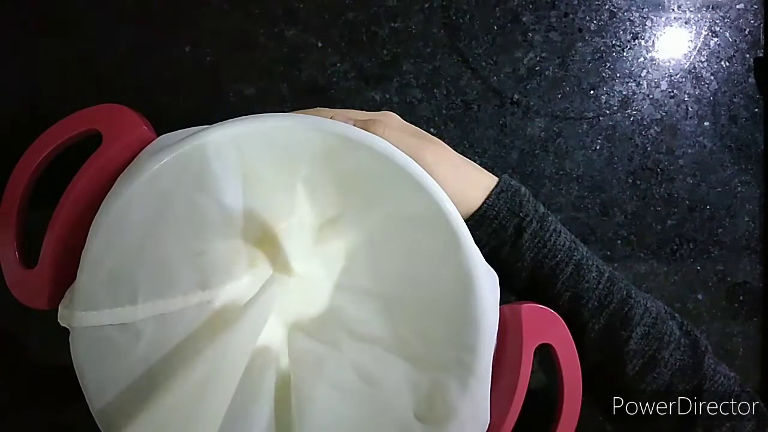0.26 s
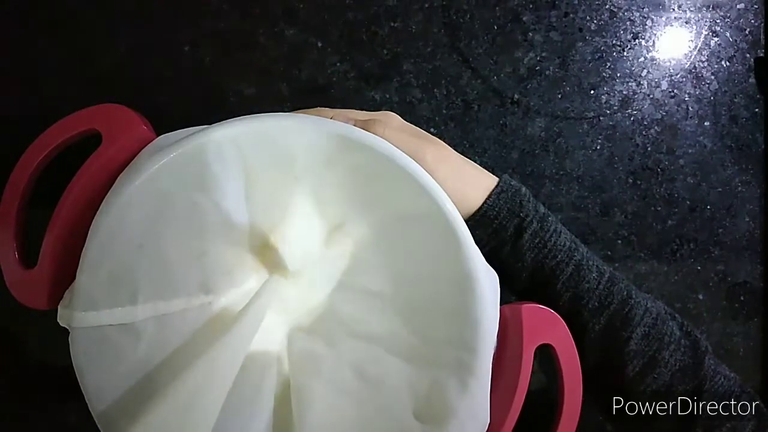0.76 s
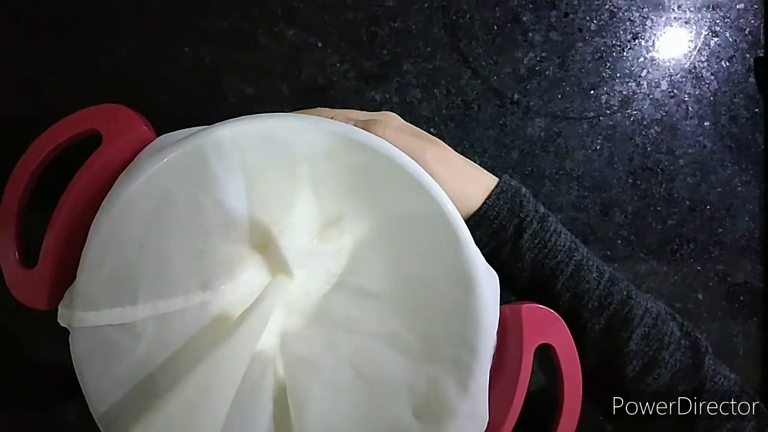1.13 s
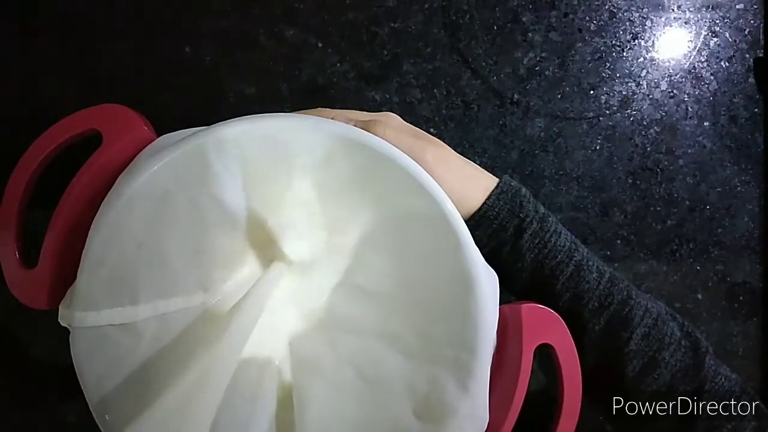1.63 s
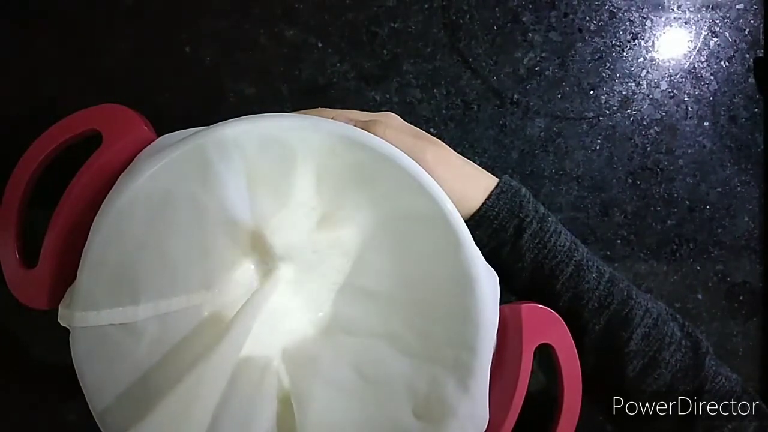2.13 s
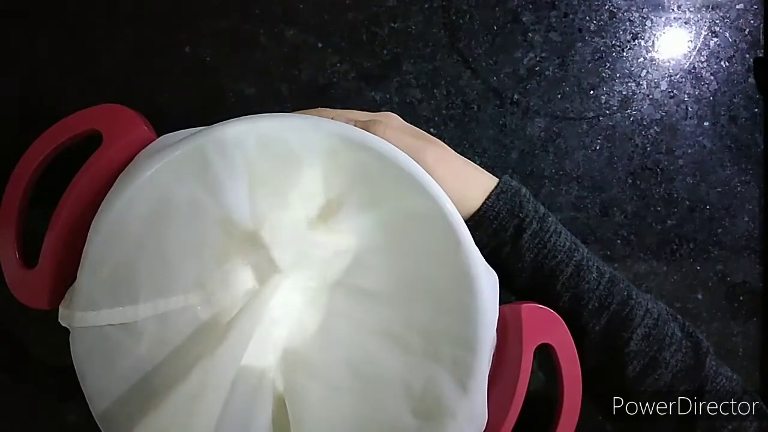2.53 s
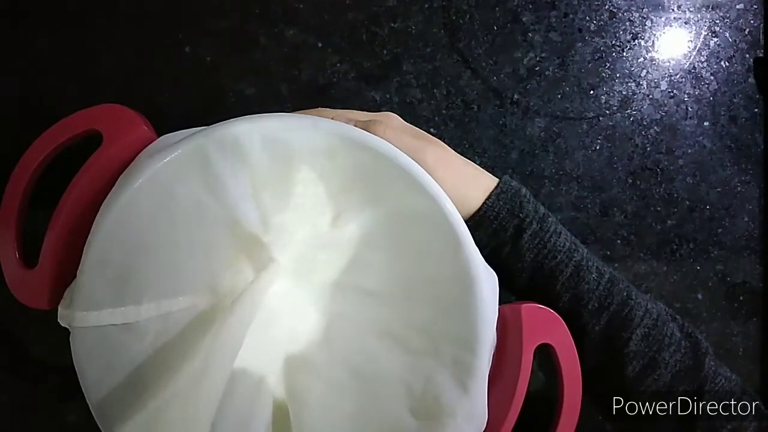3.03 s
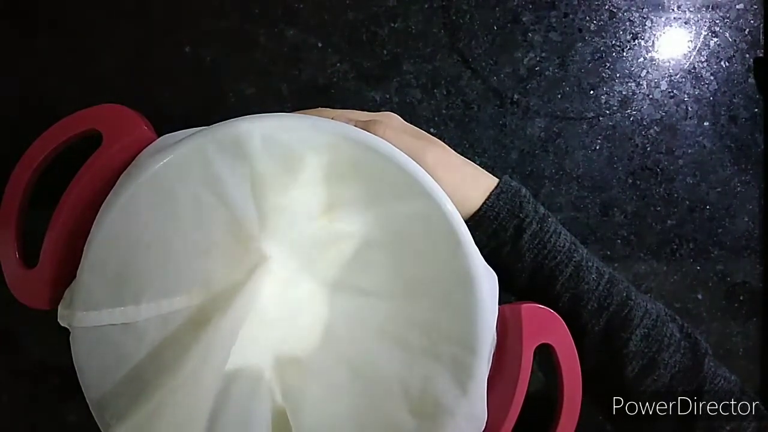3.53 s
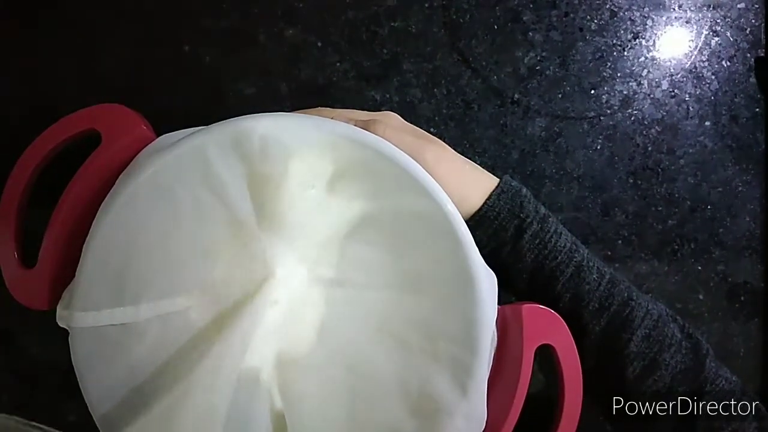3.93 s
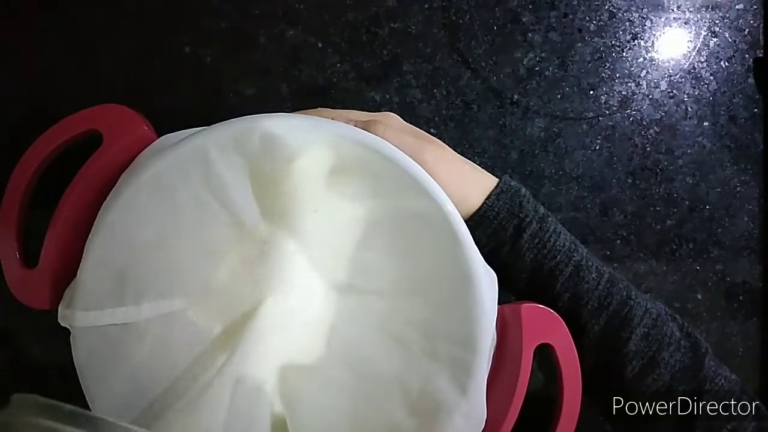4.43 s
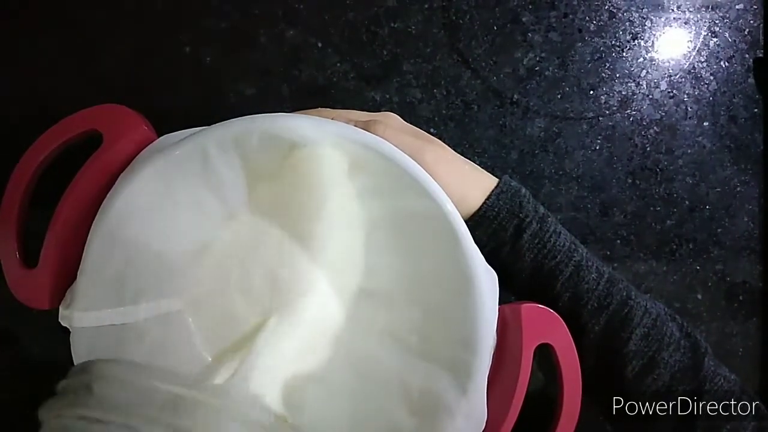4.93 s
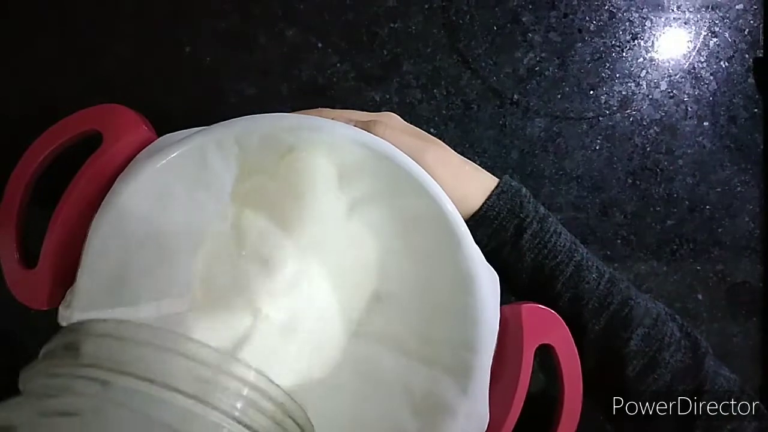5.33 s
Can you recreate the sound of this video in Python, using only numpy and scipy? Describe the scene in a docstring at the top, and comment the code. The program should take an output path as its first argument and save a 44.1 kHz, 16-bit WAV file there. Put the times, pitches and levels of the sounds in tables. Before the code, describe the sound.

Milk trickles through a cloth strainer into a metal pot, fizzing and plipping, thinning to sparse drips, then gulping in wet bursts over low rumble.

```python
"""Milk poured through a cloth strainer trickles into a steel pot with a fizz of tiny bubbles; a low rumble lies under it.
Jets and surges drive filtered random impacts and decaying bubble tones: a fizz, a fine mist and a coarse spatter.
The spatter excites the pot's resonances, and the enclosed air sounds with the jets.
Single drops tick, larger bubbles plip, and gulps flop into the cloth with a slap and the note of trapped air.
The rumble is filtered noise with a wavering spectrum, joined by a faint fuzzy tone; echoes spread the milk sounds."""
import sys
import numpy as np
from scipy import signal
from scipy.fft import rfft, irfft
from scipy.io import wavfile
from scipy.ndimage import uniform_filter1d, map_coordinates

SR = 44100
rng = np.random.default_rng(int(sys.argv[2]) if len(sys.argv) > 2 else 0)


def inscribe(sig):
    """Save sig as 16-bit PCM at rate SR to the path in sys.argv[1].

    A 1-D sig is mono; a 2-D sig holds one channel per row.
    Samples are clipped to [-1, 1] before scaling.
    """
    pcm = np.round(np.clip(np.atleast_2d(sig).T, -1, 1) * 32767)
    wavfile.write(sys.argv[1], SR, pcm.astype(np.int16))


N = 245195
TIME = np.arange(N) / SR  # [s]

# continuous seepage: (time [s], relative fizz level [dB], relative level of the deeper bubbles [dB])
SEEPAGE = [(0, -45, -7), (1.2, -43, 2), (1.45, -51, 3), (1.57, -48.5, 6), (1.8, -50.5, -0.5),
           (2.55, -51, 7), (2.77, -48.5, 1), (3.0, -51, 5), (3.3, -51.5, 3), (3.5, -52.5, 10.5),
           (3.7, -51, -16), (3.8, -55.5, -10), (3.95, -54, -12), (4.1, -50.5, 1.5), (4.65, -53.5, -11),
           (4.9, -60.5, -27), (5.1, -53.5, -5), (5.399, -53.5, -14)]
# low resonances of the pot: (frequency [Hz], bandwidth [Hz], gain [dB])
POT_MODES = [(920, 90, -9), (1123, 124, -11.5), (1450, 57, -7.5), (1800, 167, -3.5), (2024, 110, -7.5),
             (2197, 57, -1.5), (2730, 55, -1), (3090, 120, -8)]


def amp(db):
    """Logarithmic level: decibels become an amplitude ratio."""
    return 10 ** (np.asarray(db) / 20)


def evened(x):
    """Root-mean-square normalization: the mid signal of a stereo pair gets rms 1."""
    return x / np.sqrt(np.mean(x.mean(0) ** 2) + 1e-20)


def read(points, hz):
    """Spectral interpolation: a table is read on a log-frequency axis."""
    f, value = np.transpose(points)
    return np.interp(np.log(hz + 1), np.log(f + 1), value)


def level(curve):
    """Amplitude envelope: rows of (time [s], level [dB]) become a gain at every sample."""
    return amp(np.interp(TIME, *np.transpose(curve)))


def add(mix, s, sound):
    """Superposition: a sound is summed into the stereo mix from time s."""
    part = mix[:, max(round(s * SR), 0):][:, :sound.shape[-1]]
    part += sound[..., :part.shape[1]]


def panned(lean_db):
    """Interaural level difference: a left-right difference is split evenly into two gains."""
    return amp(np.array([[.5], [-.5]]) * lean_db)


def convolve(x, response):
    """Linear system: both channels pass through an impulse response and keep their length."""
    return signal.oaconvolve(x, np.atleast_2d(response), axes=1)[:, :x.shape[1]]


def coloured(x, points, size=4096):
    """Minimum-phase filtering: a causal response with the given spectrum keeps attacks sharp."""
    log_gain = np.log(amp(read(points, abs(np.fft.fftfreq(size, 1 / SR)))))
    # the Hilbert transform of the log gain yields the minimum phase
    spectrum = np.exp(np.conj(signal.hilbert(log_gain)))
    return convolve(x, np.fft.ifft(spectrum).real[:size // 2])


def ringing(modes):
    """Modal superposition: damped cosines, whose bandwidth sets their decay, form an impulse response."""
    t = np.arange(SR // 8) / SR
    response = np.zeros(len(t))
    for hz, width, db in modes:
        decay = np.exp(-np.pi * width * t)
        response += amp(db) * 2 * np.pi * width / SR * decay * np.cos(2 * np.pi * hz * t)
    return response


def swell(rise_s):
    """Onset envelope: a Gaussian rise gives a short sound a soft start."""
    return 1 - np.exp(-(np.arange(SR // 8) / SR / rise_s) ** 2)


def bubble(hz, t60, rise, onset_cycles):
    """Bubble resonance: a pocket of air rings and decays; its pitch climbs as it nears the surface."""
    t = np.arange(SR // 8) / SR
    turns = hz * t * (1 + .5 * rise * t / t60)
    wave = np.sin(2 * np.pi * turns) * amp(-60 * t / t60) * (1 - np.exp(-turns / onset_cycles))
    return wave / abs(wave).max()


def impacts(per_s, spread_db, clump_db, clump_hz):
    """Random point process: impacts at random samples, whose unequal sizes swell in clumps."""
    at = rng.integers(0, N, int(per_s * TIME[-1]))
    knots = rng.standard_normal(int(clump_hz * TIME[-1]) + 2)
    clumps = np.interp(at, np.linspace(0, N, len(knots)), np.clip(knots, -2, 2))
    size_db = spread_db * np.minimum(rng.exponential(1, len(at)), 4.5) + clump_db * clumps
    return at, amp(size_db) * rng.choice([-1, 1], len(at))


def train(at, size, scatter_db):
    """Impulse train: each stereo click has its own left-right level difference."""
    sides = panned(scatter_db * rng.standard_normal(len(at))) * size
    return np.array([np.bincount(at, side, N) for side in sides])


def bunches(at, kind, count, size=5):
    """Correlated random field: bubbles of like size swell and fade together."""
    BUNCH_DB, KNOTS_PER_S = 2, 24.04
    field = uniform_filter1d(rng.standard_normal((256, count)), size, axis=1) * np.sqrt(size)
    places = [at / SR * KNOTS_PER_S, kind]
    return amp(BUNCH_DB * np.clip(map_coordinates(field, places, order=1, mode="mirror"), -2, 2))


def bubbles(at, size, pitches_hz, cycles, rise, scatter_db):
    """Superposed bubble resonances: each impact rings one bubble, of one of many pitches."""
    kind = rng.integers(0, len(pitches_hz), len(at))
    size = size * bunches(at, kind, len(pitches_hz))
    out = np.zeros((2, N))
    for k, hz in enumerate(pitches_hz):
        pitch = hz * rng.uniform(0.96, 1.02)
        t60 = cycles * rng.uniform(0.76, 3.7) / hz
        ring = bubble(pitch, t60, rise, onset_cycles=0.61)[:1024]
        clicks = train(at[kind == k], size[kind == k], scatter_db)
        # the path to each side differs by up to two samples
        clicks[1] = np.roll(clicks[1], rng.integers(-2, 3))
        out += convolve(clicks, ring / np.linalg.norm(ring))
    return out


def crackle(t60, apart):
    """Decaying noise burst: a stereo spray of unequal droplets with an uneven envelope."""
    UNEVEN_DB, KNOTS_PER_S = 0.5, 683
    t = np.arange(SR // 8) / SR
    knots = np.clip(rng.standard_normal(512), -2, 2)
    uneven_db = UNEVEN_DB * (np.interp(t * KNOTS_PER_S, np.arange(len(knots)), knots) - .5)
    grit = rng.standard_normal(len(t)) + apart * rng.standard_normal((2, len(t)))
    return grit * swell(rise_s=0.0011) * amp(uneven_db - 60 * t / t60)


def echoes(x, t60, wet_db, delay, count=4):
    """Diffuse reverberation: decaying reflections differ by side; slow modulation keeps them from sounding fixed."""
    t = np.arange(int(SR * .25)) / SR
    shape = (count, 2, len(t))
    taps = rng.standard_normal(shape) * (rng.random(shape) < .2)
    taps *= amp(-60 * t / t60) * (t > delay)
    taps /= np.linalg.norm(taps, axis=2, keepdims=True)
    turn = 2 * np.pi * 3.3 * TIME  # 3.3 Hz modulation of every echo set
    tail = sum(convolve(x * np.cos(turn + np.pi * k / count), taps[k]) for k in range(count))
    return x + amp(wet_db) * np.sqrt(2 / count) * tail


def strays(per_s, strength, peak_db, range_hz, spread_db=3):
    """Random sampling: small events follow a strength curve, as rows of (time [s], peak [dB], pitch [Hz])."""
    when, size, pitch = rng.random((int(per_s * TIME[-1]), 3)).T
    low, high = range_hz
    db = 20 * np.log10(strength[(when * N).astype(int)]) + peak_db + spread_db * (2 * size - 1)
    return list(zip(when * TIME[-1], db, low * (high / low) ** pitch))


def runs(column, fade_db_per_s=None):
    """Power addition: each jet sets in quickly, holds, and decays exponentially."""
    # jets of milk: (start [s], end [s], decay [dB/s],
    # relative fizz level [dB], relative spatter level [dB], relative level of the air in the pot [dB])
    jets = [(-0.03, 1.25, 120, -50, -48.5, -60), (1.834, 1.943, 189, -45, -44.5, -57),
            (2, 2.287, 54, -49, -49.5, -67), (4.02, 4.455, 156, -67, -58.5, -88),
            (4.473, 4.76, 146, -52, -52, -74), (5.17, 5.603, 150, -51.5, -56, -60)]
    ATTACK_S = 0.028
    power = np.zeros(N)
    for start, end, fade, *levels_db in jets:
        attack = np.clip((TIME - start) / ATTACK_S, 0, 1)
        decay_db = (fade_db_per_s or fade) * np.maximum(TIME - end, 0)
        power += (attack * amp(levels_db[column] - decay_db)) ** 2
    return power


def surges(column):
    """Power addition: each brief surge is a lopsided sine arch."""
    # surges of the stream: (start [s], length [s], relative fizz level [dB], relative spatter level [dB])
    arches = [(-0.02, 0.12, -35.5, -65), (0.084, 0.14, -40.5, -67), (0.362, 0.037, -38, -49),
              (0.424, 0.16, -39, -43.5), (0.714, 0.06, -37.5, -52), (0.832, 0.13, -48, -45),
              (0.917, 0.19, -38, -48.5), (1.088, 0.034, -47, -46), (1.166, 0.03, -41, -61),
              (1.268, 0.046, -38, -73), (2.026, 0.032, -40, -50), (2.172, 0.11, -57, -48.5),
              (2.219, 0.28, -43.5, -52), (2.398, 0.08, -42, -56), (2.464, 0.028, -42, -58),
              (2.509, 0.097, -47.5, -61), (2.62, 0.16, -53, -57), (3.377, 0.085, -50, -74),
              (3.778, 0.1, -48, -76), (4.02, 0.074, -49.5, -66), (4.274, 0.063, -53, -51),
              (4.417, 0.16, -50.5, -55.5), (4.49, 0.046, -58, -50), (4.613, 0.043, -48, -48),
              (4.709, 0.043, -41.5, -44), (4.865, 0.24, -55.5, -59.5), (5.229, 0.024, -46.5, -44),
              (5.331, 0.52, -47.5, -51)]
    SKEW = 0.4  # under 1: a surge rises faster than it falls
    power = np.zeros(N)
    for start, length, *levels_db in arches:
        inside = (TIME > start) & (TIME < start + length)
        arch = np.sin(np.pi * ((TIME[inside] - start) / length) ** SKEW)
        power[inside] += (amp(levels_db[column]) * arch) ** 2
    return power


def flow(seep_spatter_db=-85):
    """Incoherent addition: seepage, jets and surges sum in power to drive fizz, spatter and pot air."""
    seep = level([(s, db) for s, db, _ in SEEPAGE])
    fizz = np.sqrt(seep ** 2 + runs(0) + surges(0))
    splash = np.sqrt(amp(seep_spatter_db) ** 2 + runs(1) + surges(1))
    air = np.sqrt(runs(2, fade_db_per_s=34.5))
    return fizz, splash, air


def trickle(strength, count=46):
    """Bubble resonance: thin streams whip up a fizz of tiny bubbles, with some deeper ones among them."""
    # spectra of the fine and the deeper bubbles: (frequency [Hz], gain [dB])
    fizz_colour = [(900, -78), (1800, -35), (2600, -42), (3800, -22), (4900, -7.5), (6200, -2), (7200, 3),
                   (8300, 0), (9200, -5.5), (10300, -18), (14000, -39)]
    deep_colour = [(900, -55), (1650, -37), (2000, -15), (2800, -2), (3500, -1.5), (4300, 4), (5300, 4.5),
                   (7000, -0.5), (14000, -95)]
    # bright resonances of the pot's wall: (frequency [Hz], bandwidth [Hz], gain [dB])
    wall_modes = [(4380, 95, 7), (4760, 24, 9), (4880, 43, 11.5), (5190, 45, 3.5), (5490, 52, 5),
                  (6020, 61, 5), (6280, 82, 4), (6520, 80, 0), (7000, 39, -4.5), (7140, 35, 4),
                  (7210, 36, -2), (7480, 60, 4.5), (8240, 56, 8.5)]
    WALL_FULL_DB, WALL_EXPONENT = -39.5, 0.5  # only a strong stream makes the wall ring fully

    at, size = impacts(per_s=3800, spread_db=2.4, clump_db=1.7, clump_hz=50)
    pitches = np.linspace(3000, 11000, count)
    fizz = coloured(bubbles(at, size, pitches, cycles=16.6, rise=0.035, scatter_db=5.0), fizz_colour)

    at, size = impacts(per_s=1400, spread_db=0.8, clump_db=3.0, clump_hz=56.7)
    pitches = np.linspace(1900, 6000, count // 2)
    deep = coloured(bubbles(at, size, pitches, cycles=23.0, rise=0.0096, scatter_db=6.5), deep_colour)
    deep = deep + amp(1.5) * convolve(deep, ringing(POT_MODES))

    wall = np.minimum(strength / amp(WALL_FULL_DB), 1) ** WALL_EXPONENT
    rung = fizz + amp(-2.5) * wall * convolve(fizz, ringing(wall_modes))
    depth = level([(s, db) for s, _, db in SEEPAGE])
    return amp(-5.0) * strength * (evened(rung) + amp(-9.0) * depth * evened(deep))


def mist(strength, full_db=-92):
    """Filtered impulse noise: a strong stream throws the finest droplets, which vanish first as it thins."""
    # spectrum of the droplets: (frequency [Hz], gain [dB])
    colour = [(3000, -61), (6000, -7.5), (8500, -2), (10000, -1.5), (12000, -10), (14000, -17.5)]
    at, size = impacts(per_s=2200, spread_db=1.8, clump_db=3.5, clump_hz=35)
    ticks = coloured(train(at, size, scatter_db=12.0), colour)
    return amp(-58.0) * strength / amp(full_db) * evened(ticks)


def spatter(strength, count=20):
    """Impact excitation: coarse drops smack the milk, leave gurgling bubbles and ring the pot's modes."""
    # spectra of the splash and its deeper part: (frequency [Hz], gain [dB])
    splash_colour = [(300, -35), (720, -18), (1000, 1.5), (1550, -8.5), (2100, 7), (2500, 3.5), (3200, 7.5),
                     (3800, 5), (5000, 4), (9000, 11), (14000, -28.5)]
    deep_colour = [(200, -16), (360, 16), (470, 1.5), (750, -9), (860, 1), (1000, 6), (1400, 6),
                   (1900, -13), (4000, -22.5), (14000, -64)]
    # resonance of the rim: (frequency [Hz], bandwidth [Hz], gain [dB])
    rim_modes = [(4360, 45, 12)]
    RIM_FROM_S = 4.0  # only the last spatters also ring the rim
    # the splash deepens with its strength and as the pot fills
    FULL_DB, DEEPER_EXPONENT, DEEPER_DB_PER_S = -43.5, 0.06, 1.09

    at, size = impacts(per_s=1100, spread_db=2.2, clump_db=2.6, clump_hz=55)
    smacks = evened(train(at, size, scatter_db=14.5))
    pitches = np.geomspace(750, 4300, count)
    gurgle = evened(bubbles(at, size, pitches, cycles=18, rise=0.3, scatter_db=7))
    drive = smacks + amp(-1.5) * gurgle

    depth = (strength / amp(FULL_DB)) ** DEEPER_EXPONENT * amp(DEEPER_DB_PER_S * TIME)
    splash = coloured(drive, splash_colour) + amp(-4.5) * depth * coloured(drive, deep_colour)
    pot = amp(9) * convolve(splash, ringing(POT_MODES))
    rim = (TIME > RIM_FROM_S) * convolve(splash, ringing(rim_modes))
    return amp(-4.5) * strength * evened(splash + pot + rim)


def hollow(strength):
    """Cavity resonance: the falling milk keeps the air in the pot sounding."""
    # the air between milk and cloth: (frequency [Hz], bandwidth [Hz], gain [dB])
    cavity_modes = [(500, 34, -3), (600, 10, 4.5)]
    at, size = impacts(per_s=500, spread_db=1.5, clump_db=1, clump_hz=30)
    air = convolve(train(at, size, scatter_db=11.5), ringing(cavity_modes))
    air = convolve(air, ringing([(555.5, 50, 0)]))
    return amp(-6.5) * strength * evened(air)


def glugs(strength):
    """Bubble resonance: pockets of air under the jet sound short notes at scattered pitches."""
    out = np.zeros((2, N))
    for s, db, hz in strays(60, strength, peak_db=0.5, range_hz=(534.4, 627.6)):
        add(out, s, amp(db) * bubble(hz, t60=0.078, rise=0.074, onset_cycles=5.7))
    return out


def rumble():
    """Partially correlated noise: the low noise of the kitchen is shaped in the frequency domain."""
    # spectrum: (frequency [Hz], gain [dB])
    colour = [(25, -41), (45, -16.5), (70, -11), (103, 4), (125, -3), (150, 0), (220, -6.5), (280, -12),
              (380, -14.5), (480, -39), (600, -36), (1500, -39.5), (9000, -78)]
    # likeness of the two channels: (frequency [Hz], correlation [0 to 1])
    likeness = [(30, 0.45), (80, 1), (160, 0.86), (350, 0.17), (1000, 0.025)]
    hz = np.fft.rfftfreq(N, 1 / SR)
    a, b = rfft(rng.standard_normal((2, N)))
    same = np.clip(read(likeness, hz), -1, 1)
    pair = np.array([a, same * a + np.sqrt(1 - same ** 2) * b]) * amp(read(colour, hz))
    return amp(-57.5) * panned(1) * evened(irfft(pair, N))


def wavering(x, size=2048):
    """Time-frequency modulation: patches of the spectrum swell and fade on their own."""
    WAVER_DB, PATCHES_PER_S, PATCHES_PER_OCTAVE = 1.7, 7, 3
    overlap = size * 3 // 4
    hz, t, z = signal.stft(x, SR, nperseg=size, noverlap=overlap)
    places = np.meshgrid(np.log2(hz + 1) * PATCHES_PER_OCTAVE, t * PATCHES_PER_S, indexing="ij")
    patches = map_coordinates(rng.standard_normal((48, 96)), places, order=1, mode="mirror")
    return signal.istft(z * amp(WAVER_DB * patches), SR, nperseg=size, noverlap=overlap)[1][:, :N]


def drone():
    """Amplitude modulation: slow noise on a gliding sine makes a faint fuzzy tone above the low rumble."""
    # wandering tone: (time [s], level [dB], pitch [Hz])
    path = [(0, -85.5, 396), (3.1, -70, 396), (3.72, -85.5, 370), (3.9, -64.5, 405), (4.05, -67, 395),
            (4.3, -75.5, 385), (5.56, -68.5, 396)]
    noise = rng.standard_normal(N) + 0.39 * rng.standard_normal((2, N))
    # resonances at 0 Hz act as low-passes
    fuzz = convolve(convolve(noise, ringing([(0, 25, 0)])), ringing([(0, 75, 0)]))
    when, db, hz = np.transpose(path)
    phase = 2 * np.pi * np.cumsum(np.interp(TIME, when, hz)) / SR
    return amp(np.interp(TIME, when, db)) * evened(fuzz * np.sin(phase))


def gulps():
    """Trapped-air resonance: a gulp lands with a soft slap and traps a big pocket of air, then a smaller one."""
    # gulps into the cloth: (time [s], relative peak level [dB], starting pitch of the trapped air [Hz],
    # decay time t60 [s], relative slap level [dB])
    flops = [(0.0, -37, 577, 0.042, -8), (0.160, -42, 560, 0.084, -31), (0.425, -42, 600, 0.08, -19),
             (0.492, -39.5, 572, 0.08, -24), (0.528, -43.5, 612, 0.076, -15), (0.858, -48, 564, 0.18, -14),
             (0.936, -34, 568, 0.07, -15), (1.064, -39, 566, 0.1, -9), (1.405, -48.5, 590, 0.13, -25),
             (1.895, -51, 600, 0.095, 3), (2.205, -46, 583, 0.11, -10), (2.28, -43.5, 577, 0.056, -15),
             (2.595, -50, 597, 0.12, -35), (2.655, -53, 590, 0.099, -14), (4.289, -55, 780, 0.16, 8),
             (4.312, -58, 625, 0.15, -2), (4.502, -40.5, 600, 0.12, -2.5), (4.609, -43, 633, 0.12, 2),
             (4.632, -44, 970, 0.037, 4.5), (4.725, -59, 620, 0.24, 9), (5.181, -34, 608, 0.047, -1.5),
             (5.193, -46, 160, 0.19, 8), (5.238, -37.5, 600, 0.15, -1), (5.246, -35.5, 167, 0.056, -1),
             (5.273, -29.5, 336, 0.024, -6.5), (5.284, -32, 151, 0.091, -7.5), (5.449, -34.5, 623, 0.1, -5),
             (5.496, -36, 603, 0.19, -2.5), (5.514, -30.5, 591, 0.16, -12)]
    # spectrum of the slap: (frequency [Hz], gain [dB])
    slap_colour = [(80, -15.5), (250, 4.5), (380, 2.5), (480, -11), (720, 2), (900, -3), (1400, -12),
                   (2500, -10.5), (5000, -39), (12000, -59)]
    TWIN_RATIO, TWIN_DB, TWIN_LATE_S = 1.1, -14.5, 0.00797  # the smaller pocket
    out = np.zeros((2, N))
    for s, db, hz, t60, slap_db in flops:
        slap = coloured(crackle(t60=0.065, apart=1.48), slap_colour)
        pocket = bubble(hz, t60, rise=0.059, onset_cycles=2.15)
        twin = bubble(hz * TWIN_RATIO, t60 / 2, rise=0.1, onset_cycles=1.7)
        add(out, s, amp(db) * (pocket + amp(slap_db + 11.5) * slap))
        add(out, s + TWIN_LATE_S, amp(db + TWIN_DB) * twin)
    return amp(-6.5) * out


def drops(strength):
    """Impact resonance: each drop strikes the pot's wall, which rings briefly at a high pitch, and throws a
    spray; others fall at random."""
    # single drops: (time [s], relative peak level [dB], starting pitch of the ring [Hz], # left-right
    # difference [dB], relative spray level [dB], decay time t60 [s])
    single = [(0.016, -27, 4880, -8.5, -11, 0.051), (0.056, -20.5, 7100, -13, -18.5, 0.0094),
              (0.118, -42, 4900, -13, -22, .02), (0.129, -32, 7560, -11, -20, .02),
              (0.1425, -37, 7100, -15, -22, .014), (0.149, -41, 4930, -14, -19, 0.035),
              (0.151, -33.5, 7130, -13, -24, 0.018), (0.184, -36, 8610, 10, -20, .014),
              (0.208, -36, 7190, -10, -20, .014), (0.269, -41, 7150, -13, -28, .016),
              (0.287, -28, 7230, -7, -16, .016), (0.348, -33, 7100, -13, -26, .018),
              (0.437, -25.5, 5500, -3, -0.5, .01), (0.468, -34, 4990, -9, -5, 0.012),
              (0.5255, -31, 7140, 0, -9, .01), (0.579, -36, 7130, -12, -13, .014),
              (0.624, -31, 7250, -6, -12, .012), (0.682, -40, 5000, -16, -14, 0.014),
              (0.715, -35, 8240, -7, -15, .01), (0.767, -29, 3940, -1, -8, 0.011),
              (0.7854, -30, 6270, -4, -7, .01), (0.8128, -26, 8250, -1, -8, 0.018),
              (0.8879, -32, 7140, -6, -9, .01), (0.906, -34.5, 7640, 3, -13, .014),
              (0.970, -33, 7620, 5, -13, .016), (1.093, -33, 8240, 8, -18, .025),
              (1.243, -22, 8190, -1, -15, 0.013), (1.245, -24.5, 8230, 4, -17, 0.017),
              (1.279, -38, 5430, -5, -10, .02), (1.283, -32, 6780, -7, -18, .016),
              (1.3006, -26, 7500, -4, -9.5, 0.01), (1.488, -42.5, 5700, -13, -25, 0.018),
              (1.53, -36, 7800, -6, -9, .018), (1.613, -45, 6720, -7, -20, 0.017),
              (1.817, -43.5, 7540, -15, -16, .014), (1.8296, -42.5, 6050, -1, 2.5, .01),
              (1.843, -35, 6100, -1, 2, .01), (1.919, -37, 8200, 0, 3.5, .015),
              (2.030, -37.5, 4930, -3, 2, .015), (2.083, -31.5, 8080, 1, -3.5, .02),
              (2.1965, -33.5, 6950, -1, -4, .01), (2.2418, -30.5, 7750, -2, -8, 0.013),
              (2.561, -34, 2250, 4, -16, 0.011), (2.625, -32, 4820, 6, -7.5, 0.015),
              (2.632, -35, 4900, 0, -8, 0.016), (2.6825, -40.5, 6050, -3, 0, .01),
              (2.693, -37.5, 6290, -4, -7, .014), (2.720, -47, 7100, -26, -19, .014),
              (2.81, -33.5, 6380, -5, -11, .016), (2.8643, -30.5, 6780, -2, -12.5, 0.0074),
              (3.427, -39.5, 6230, -1, -1, .015), (3.744, -51.5, 4350, -7, -18, 0.039),
              (4.057, -38.5, 7500, -10, -13, .01), (4.077, -36, 8100, 7, -24, 0.012),
              (4.163, -37, 7150, -10, -27, 0.0088), (4.2795, -36, 7500, -3, -5, .01),
              (4.392, -38.5, 7320, -8, -28, .01), (4.435, -36.5, 7400, -13, -21, .012),
              (4.452, -36, 6300, -5, -21, .01), (4.502, -30.5, 6520, -5.5, -7, .01),
              (4.506, -36, 6940, -7, -3, .01), (4.5325, -28.5, 7050, -3, -9, .012),
              (4.602, -38, 6560, -4, -1, .01), (4.634, -39.5, 5000, -4, 0, .015),
              (4.67, -40, 7240, -2, -10, .012), (4.691, -45, 4370, -5, -18, 0.067),
              (4.7118, -32, 7630, 1, -6.5, .014), (4.89, -50, 5500, -7, -1, .01),
              (5.009, -54.5, 3520, -5, -22, .04), (5.072, -41, 8640, 3, -27, 0.011),
              (5.1487, -30.5, 5500, -8, -12.5, 0.0076), (5.154, -34, 6530, 2, -5.5, 0.01),
              (5.437, -46, 6540, -8, -19, .014), (5.484, -26.5, 7740, -5, -12, .014),
              (5.537, -39.5, 6200, 1, 1.5, 0.019)]
    spray_colour = [(400, -35.0), (2000, -16.0), (4000, 0.0), (6000, 8.5), (8000, 7.5), (10000, -10.0), (14000, -40)]
    small = []
    for row in strays(9, strength, peak_db=3.5, range_hz=(5500, 8240)):
        small.append((*row, rng.uniform(4, 4.6), -13, .012))
    t = np.arange(SR // 8) / SR
    spray_decay = amp(-60 * t / .02) + amp(-9) * amp(-60 * t / .09)  # a fast and a slow part
    out = np.zeros((2, N))
    for s, db, hz, lean_db, spray_db, t60 in single + small:
        ping = bubble(hz, t60, rise=.03, onset_cycles=3)
        spray = coloured(rng.standard_normal((2, len(t))) * spray_decay, spray_colour)
        add(out, s + .0006, amp(db) * panned(lean_db) * (ping + amp(spray_db) * spray))
    return amp(-0.5) * echoes(out, t60=.06, wet_db=-6, delay=.001)


def plips(strength):
    """Bubble resonance: larger bubbles surface with a rising note in a wet spray, amid a random patter."""
    # single bubbles: (time [s], relative peak level [dB], starting pitch [Hz], decay time t60 [s])
    single = [(0.019, -35, 3000, 0.019), (0.079, -40, 2070, 0.028), (0.287, -27.5, 2120, 0.033),
              (0.415, -43, 1890, .014), (0.444, -29, 2320, 0.013), (0.523, -34.5, 2106, .025),
              (0.769, -33, 2170, 0.023), (0.864, -38, 2030, .022), (1.021, -34.5, 2175, 0.014),
              (1.114, -30, 3020, .01), (1.2, -41, 2710, .016), (1.871, -29, 2940, 0.0072),
              (1.900, -28, 3090, 0.014), (1.919, -25.5, 2147, 0.028), (2.116, -37, 3870, .016),
              (2.177, -25.5, 2030, 0.012), (2.185, -31.5, 3900, 0.017), (2.198, -36.5, 1095, 0.019),
              (2.268, -38, 2080, .02), (2.47, -36.5, 2300, 0.024), (2.653, -35.5, 2150, 0.022),
              (2.812, -48, 2190, 0.046), (3.07, -65, 797, 0.13), (3.095, -53.5, 2260, 0.09),
              (3.346, -54.5, 1870, 0.12), (3.391, -57, 2270, 0.03), (3.409, -48, 1856, 0.065),
              (3.43, -47, 2220, 0.03), (4.042, -43.5, 1420, .014), (4.044, -37.5, 2000, 0.013),
              (4.077, -40.5, 1460, .018), (4.062, -50, 1800, 0.019), (4.112, -51, 1880, 0.022),
              (4.122, -39, 2480, .018), (4.127, -44, 3030, .014), (4.132, -45, 2700, .016),
              (4.153, -43, 1460, 0.015), (4.180, -42, 1800, 0.019), (4.213, -49, 1540, 0.018),
              (4.279, -41, 2300, 0.035), (4.315, -47, 1250, 0.025), (4.336, -58, 2000, 0.021),
              (4.408, -37.5, 2300, 0.02), (4.411, -46, 2730, .018), (4.441, -36, 1900, 0.016),
              (4.455, -43, 2330, .02), (4.494, -37, 2020, .02), (4.538, -38, 2280, 0.025),
              (4.549, -41, 2770, .016), (4.606, -34.5, 920, .014), (4.652, -52, 1330, .025),
              (4.707, -36, 2310, 0.018), (4.749, -43, 2800, 0.018), (4.874, -38, 3180, 0.0097),
              (4.897, -41, 2850, 0.033), (4.925, -36.5, 2270, 0.025), (4.937, -33.5, 1930, 0.012),
              (5.155, -49, 1400, 0.018), (5.180, -35.5, 2400, 0.014), (5.236, -42, 1400, .018),
              (5.364, -35, 2210, 0.03), (5.371, -31, 2130, 0.028), (5.378, -40, 1830, 0.022),
              (5.422, -40, 1860, 0.016), (5.448, -40, 1440, 0.02), (5.487, -34, 2790, 0.026)]
    # spectrum of the spray: (multiple of the bubble's pitch [ratio], gain [dB])
    spray_shape = [(.1, -56), (.55, -21), (.85, 3.5), (1.2, 3.5), (1.8, -3), (5, -28)]
    RISE_S, SPRAY_DB = 0.002494, -6
    small = []
    for s, db, hz in strays(91, strength, peak_db=2.5, range_hz=(2000, 4900)):
        small.append((s, db, hz, 24 / hz))
    out = np.zeros((2, N))
    for s, db, hz, t60 in single + small:
        note = swell(RISE_S) * bubble(hz, t60, rise=0.057, onset_cycles=1.4)
        add(out, s - RISE_S / 2, amp(db - 3.5) * note / abs(note).max())
    for s, db, hz, _ in single:
        colour = [(hz * ratio, gain_db) for ratio, gain_db in spray_shape]
        spray = coloured(crackle(t60=0.07, apart=1.0), colour)
        add(out, s, amp(db + SPRAY_DB) * spray)
    return amp(-6) * echoes(out, t60=.06, wet_db=-4, delay=.0015)


def scene():
    """Superposition and reverberation: milk echoes in the pot and a little in the kitchen, over the rumble."""
    # stereo lean of the pouring sound: (frequency [Hz], left-right difference [dB])
    lean_table = [(600, -1), (1300, -8.5), (2100, -3.5), (3500, -2), (5500, -1.5), (7000, -8), (8400, 6.5),
                  (11000, 4.5), (14000, 4.5)]
    # slow swell of the rumble: (time [s], gain [dB])
    rumble_swell = [(0, 4.5), (0.7, 0), (1.7, 1), (2.3, 2.5), (3.4, -1.5), (4.1, 0), (5.56, 2)]
    fizz, splash, air = flow()
    stream = trickle(fizz) + mist(fizz * splash) + spatter(splash)
    in_pot = echoes(stream, t60=.04, wet_db=-2, delay=.001)
    lean = panned(read(lean_table, np.fft.rfftfreq(N, 1 / SR)))
    poured = irfft(rfft(in_pot + hollow(air) + plips(splash)) * lean, N)
    milk = poured + drops(fizz) + gulps() + glugs(air)
    kitchen = echoes(milk, t60=.2, wet_db=-12, delay=.006)
    return kitchen + level(rumble_swell) * wavering(rumble()) + drone()


def record(dry):
    """Band limitation: a linear-phase low-pass removes the highest treble."""
    EDGE_HZ = 14200
    low_pass = signal.firwin(511, EDGE_HZ, window=("kaiser", 9), fs=SR)
    return signal.oaconvolve(dry, low_pass[None], "same")


dry = scene()
out = record(dry)
inscribe(out)
```